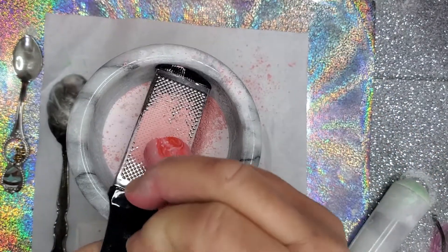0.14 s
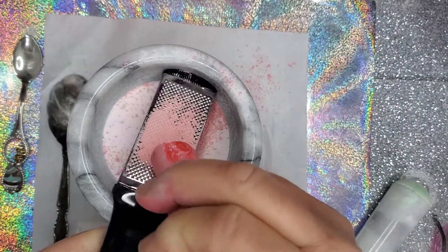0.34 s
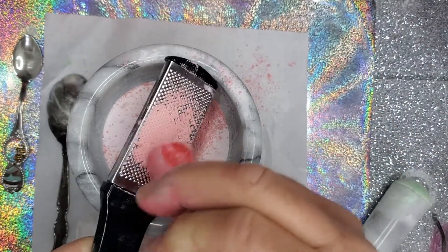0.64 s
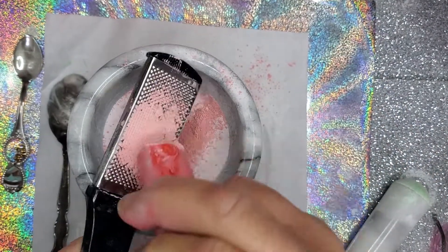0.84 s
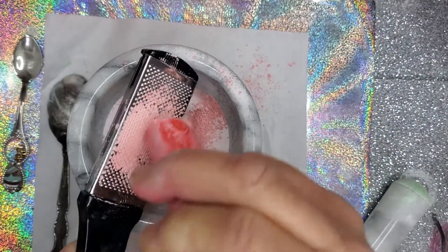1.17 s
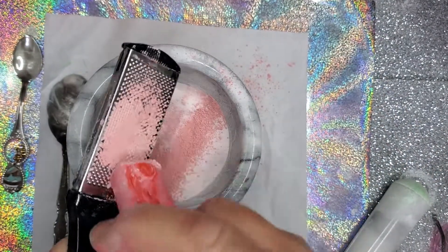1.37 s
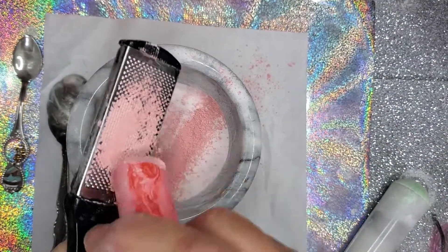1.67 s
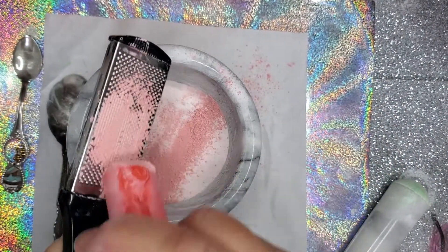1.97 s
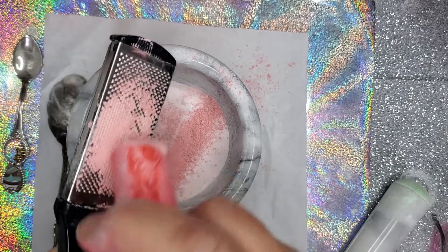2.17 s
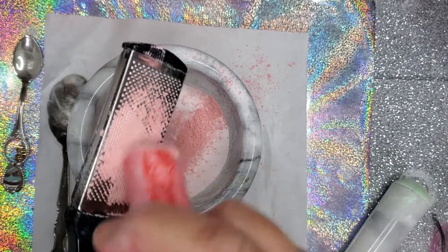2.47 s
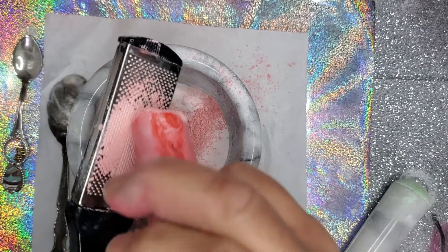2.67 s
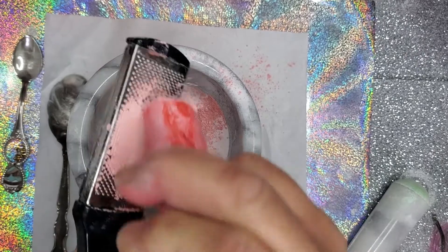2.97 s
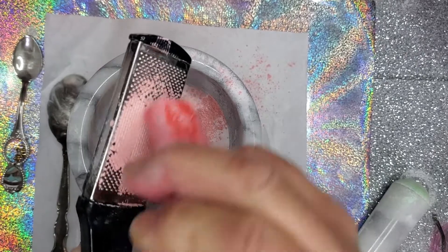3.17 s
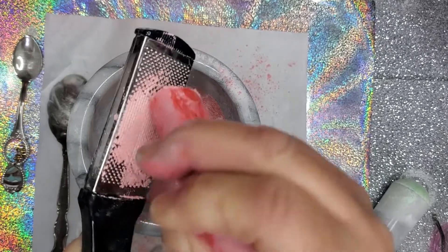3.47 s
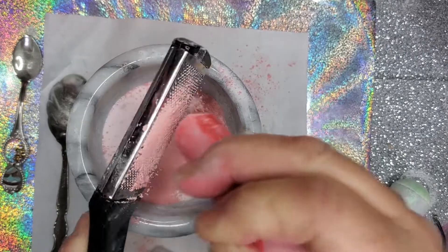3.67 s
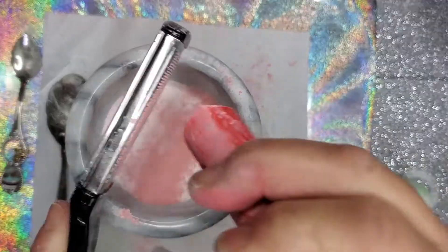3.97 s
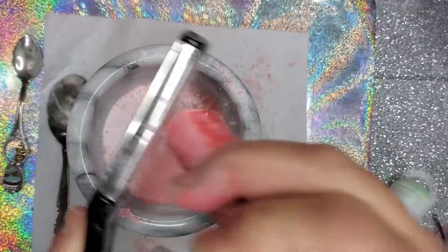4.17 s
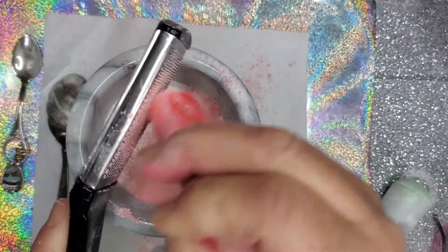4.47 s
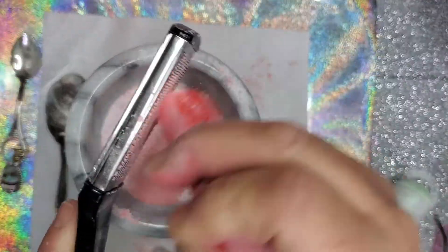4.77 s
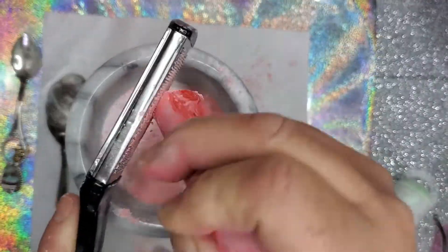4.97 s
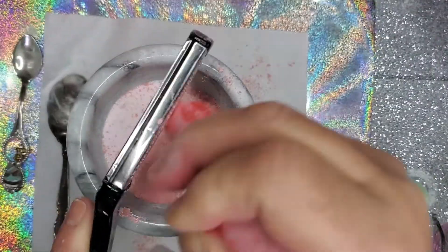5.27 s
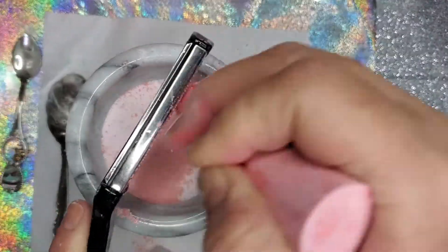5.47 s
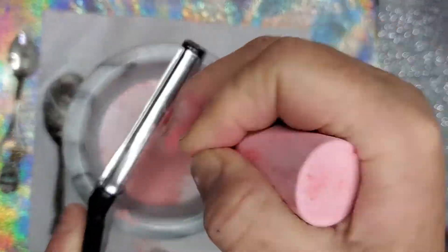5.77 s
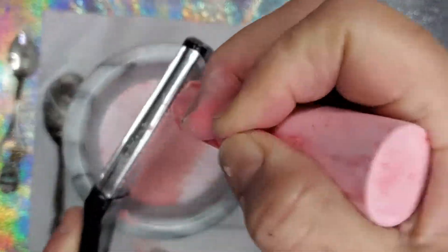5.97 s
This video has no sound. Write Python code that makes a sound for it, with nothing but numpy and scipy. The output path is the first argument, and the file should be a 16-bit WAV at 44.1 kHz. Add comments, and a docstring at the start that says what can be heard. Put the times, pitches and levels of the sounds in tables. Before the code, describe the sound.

Close up in a small quiet room, a metal grater knocks and drags on a heavy stone bowl with a dull table thud. Steady chalk rasping follows, crisp and sandy, alternating away and back. Around the middle it stops, with a knock, a harder clank and another tap, each trailing a light scrape. Then brisk, louder rubbing resumes, with more hollow bowl tone, and carries on to the end.

```python
"""A low table rumble in quiet air, then a steel grater drags and clanks on the rim of a stone mortar.
Chalk is rubbed to and fro on the grater in quick strokes; a few taps and skids break in before they resume.
Breaking grains and rough contacts drive resonators for bowl, plate and teeth; shaking noise drives the table's.
Two close microphone ports hear it with a short noise echo of a small room and steady shaped-noise air."""
import sys
import numpy as np
from scipy import signal
from scipy.fft import rfft, irfft
from scipy.io import wavfile

SR = 44100
rng = np.random.default_rng(int(sys.argv[2]) if len(sys.argv) > 2 else 0)


def output_pcm(signal):
    """Save a mono or channel-first signal as 16-bit PCM at the path in sys.argv[1].

    Samples are clipped to [-1, 1] before scaling.
    """
    pcm = np.clip(np.atleast_2d(signal).T, -1, 1) * 32767
    wavfile.write(sys.argv[1], SR, np.round(pcm).astype(np.int16))


N = 269892  # samples

# Six groups of modes, in this order throughout: rim, bowl, frame, plate, teeth, treble.
# Drive levels are relative: later group gains, mode gains and roughness act on them.

# steady room air: (frequency [Hz], relative level per Hz [dB])
AIR_COLOUR = [(15, -23), (25, -5), (45, 0.5), (102, 0), (261, -5), (371, -13), (500, -13.5), (981, -18.5),
              (3580, -21.5), (8050, -31), (15800, -22.5)]
AIR_DB, AIR_ALIKE = -76.5, 0.532  # rms level; correlation between the ports

# hands jolt the table: (time [s], hold [s], drive [dB])
JOLTS = [(0, 0.0035, -57), (0.211, 0.034, -54.5), (0.276, 0.057, -47), (0.46, 0.016, -80),
         (0.576, .01, -68), (3.835, .03, -81), (4.034, 0.0056, -59), (4.097, 0.013, -73),
         (4.204, 0.05, -70.5), (4.49, 0.037, -78), (5.403, .005, -78.5), (5.554, .005, -63.5),
         (5.676, .01, -80)]
JOLT_RISE_DB_PER_S, JOLT_FALL_DB_PER_S = 399.5, 289
# modes of the table: (frequency [Hz], width [Hz], left [dB], right [dB], extra once grater is upright [dB])
TABLE_MODES = [(59, 29, 15.5, 21.5, 1.5), (110.8, 25, 22, 24.5, 0), (174.8, 27, 18.5, 20, 1),
               (250, 38, 21.5, 21.5, 5.5), (306, 57, 23.5, 20.5, 2)]

# grater dragged on the rim: (time [s], rim drive [dB], bowl drive [dB], steel drive [dB])
DRAG = [(0, -74, -69, -68.5), (.06, -86, -84, -88), (.11, -92, -86, -74.5), (.15, -95, -90.5, -77),
        (.22, -64, -60, -58), (0.244, -45.5, -40.5, -43), (0.279, -61, -61, -64), (.32, -42, -38.5, -45),
        (.34, -44.5, -43, -47.5), (.358, -53, -55.5, -53.5), (.42, -76, -82.5, -82), (0.474, -65, -74, -75),
        (.532, -98, -92, -86), (0.557, -73, -74, -68.5), (.63, -88, -101, -88)]
# column of DRAG for each group: (drive column [index after time])
DRAG_PART = [0, 1, 2, 2, 2, 2]
# drag level of each group: (gain [dB])
DRAG_GAIN = [0, -1, -10, -2, -3.5, -9.5]
# how far each group follows the drag's swing about -55 dB: (share [dB per dB])
DRAG_FOLLOWS = [1.1, 0.97, 1.01, 1.07, 0.95, 0.75]

# blows on the grater: (time [s], stone drive [dB], steel drive [dB], brightness of teeth and treble [dB])
BLOWS = [(.106, -77, -77, 7), (.226, -51, -62, 9), (.238, -33.5, -52, -6), (.243, -35, -57, 3),
         (.246, -34.5, -48, -3), (0.261, -55, -60, -6), (.295, -39, -55, -8), (0.3143, -29.5, -56, -5),
         (0.3188, -28, -57, -5), (.327, -27.5, -61, -4), (0.338, -52, -56, -1), (.556, -72, -85, 11),
         (3.826, -35, -54.5, 12), (3.918, -58, -74, -2), (3.981, -59.5, -69, -8), (4.035, -30.5, -31, -7),
         (4.051, -66, -62, 5), (4.075, -54, -44.5, -2), (4.205, -28.5, -35, 2), (4.215, -42, -53, 1)]
# blow force on each group: (gain [dB])
BLOW_GAIN = [-5.5, 3, -3, 7.5, 0, -1]
BLOW_PEAK_S, BLOW_ROUGH = 0.00069, 0.62  # time to the peak; gain of the grit beside the hard touch
# material of each group: (0 stone, 1 steel [index])
ON_STEEL = [0, 0, 1, 1, 1, 1]
# groups that follow the brightness: (0 no, 1 yes [factor])
BRIGHT = [0, 0, 0, 0, 1, 1]

# mortar thuds on the table: (time [s], strength [dB])
THUDS = [(0.241, -33), (.300, -46.5), (.322, -43), (0.587, -64.5)]
THUD_HZ, THUD_T60_S = 163.4, 0.29

# strokes, in turn away and back: (full speed at [s], rise [s], hold [s], fall [s],
#   plate drive as the hold starts [dB], swell over the hold [dB], brightness of teeth and treble [dB])
# rise and fall are the times for a 30 dB change before SLOW_LOSS
STROKES = [(.653, .034, 0.035, 0.045, -47.5, 1, 1.5), (.767, 0.035, 0.032, 0.026, -45, -0.5, 1),
           (.886, 0.04, 0.034, 0.052, -52, 1.5, 1), (1.003, 0.032, 0.062, 0.028, -48, -3, -0.5),
           (1.151, 0.048, 0.036, .031, -47, -6.5, -2), (1.25, .021, .039, 0.052, -44, 1.5, 1),
           (1.413, 0.029, 0.044, 0.034, -44.5, -2.5, 1), (1.57, 0.052, 0.036, 0.044, -47, 1, 2),
           (1.712, 0.036, 0.06, 0.036, -46, 1, -0.5), (1.842, .017, 0.059, 0.044, -51, 11, 0),
           (1.997, 0.034, .051, .047, -43, -2, -0.5), (2.144, 0.026, .054, 0.04, -48, 5, 1),
           (2.293, 0.038, .059, 0.039, -43, 1, -0.5), (2.438, 0.032, 0.041, 0.05, -50.5, 8, 0),
           (2.581, 0.043, 0.055, 0.038, -47.5, 2.5, -1), (2.733, 0.036, .044, 0.038, -53, 7.5, -1),
           (2.872, 0.037, .058, 0.03, -49.5, 3, 0), (3.016, 0.028, .046, 0.041, -49.5, 8, 1),
           (3.16, 0.044, 0.052, .039, -45.5, 1, -0.5), (3.292, 0.03, .049, 0.04, -52.5, 11.5, 0),
           (3.434, 0.045, .046, .051, -50.5, 1, 0.5), (3.598, 0.065, 0.061, 0.028, -52.5, 10.5, -3),
           (3.864, .013, 0.0076, 0.044, -54.5, 7, -0.5), (4.269, 0.023, 0.021, 0.036, -50.5, -8.5, -2),
           (4.343, 0.024, 0.03, 0.026, -48, 3.5, 2), (4.449, 0.02, 0.063, 0.034, -41, 0.5, -1.5),
           (4.57, .029, 0.05, 0.036, -39.5, 0, -.5), (4.676, .015, .05, 0.032, -42.5, -0.5, -1.5),
           (4.782, 0.026, .058, 0.034, -44.5, 1.5, 1.5), (4.919, 0.028, 0.044, .026, -43.5, -6, -1.5),
           (5.025, 0.033, .051, .041, -46, 2.5, .5), (5.158, 0.026, 0.069, 0.011, -45.5, -3, 1),
           (5.282, 0.026, 0.042, 0.031, -47.5, 0.5, 2), (5.394, 0.021, .026, 0.039, -44, 4, 2),
           (5.516, 0.048, .037, 0.043, -44, 6.5, 0.5), (5.643, 0.037, 0.034, 0.035, -39, -1.5, 0),
           (5.774, 0.029, .019, 0.024, -49, -0.5, -4.5), (5.861, .02, .026, 0.041, -46.5, 3, 2),
           (6.019, 0.0079, 0.041, 0.052, -49.5, 6, -0.5)]
RISE_BEND, FALL_BEND = 0.89, 1.37  # edge curve in dB: under 1 a sharp corner, above 1 a round one
# dulling as the chalk slows, for each group: (extra loss [dB per dB])
SLOW_LOSS = [0, 0.14, 0.049, 0.036, 0.19, 0.15]
CREEP_DB, CREEP_STRETCH = -20.5, 2  # slow rubbing at the turns wakes the plate only; longer edges
# grater held low in the mortar, then raised, then upright: (grip starts [s])
GRIP_FROM_S = [0, 1.2, 3.7]
# each grip, strokes away then back: (rim, bowl at start, bowl at end, frame, teeth,
#   treble at start, treble at end [dB above the plate]; left-right difference [dB])
GRIPS = [
    [(-33, -0.27, 2.5, -7.5, 0, -1.5, -0.18, 3.3), (-32, -1.1, -3, -7.5, 0, -2.5, -0.63, 3.4)],
    [(-24, -11, 2.4, -15.5, -1.16, .5, 0.17, 4.4), (-47.5, -1.5, 4.8, -8.5, -1.3, -1, 0.79, 4.8)],
    [(-31.5, -1, 0, -7.5, 0, 0, 0.0099, 5), (-27, -0.26, 0, -8.5, 0.0069, 0, 0, 5.2)],
]
# how firmly the grater leans on the mortar: (time [s], bowl above the plate [dB])
LEAN = [(.65, -7.5), (.9, -13), (1.17, -12.5), (1.27, -26), (2.15, -25.5), (2.45, -18), (3.43, -18.5),
        (3.62, -11), (3.87, -6.5), (4.3, -3.5), (4.47, -7.5), (4.8, -11.5), (5.05, -13.5), (5.4, -4.5),
        (5.66, -6), (5.78, -13.5), (5.87, 1), (6.03, -5)]

# chalk skids on after a tap: (time [s], hold [s], fall over 30 dB [s], stone drive [dB], steel drive [dB])
SKIDS = [(3.826, 0.023, 0.09, -55, -57.5), (3.99, .045, 0.1, -69, -80), (4.035, 0.0054, 0.11, -53, -45),
         (4.204, 0.016, 0.18, -52.5, -55)]
# skid force on each group: (gain [dB])
SKID_GAIN = [-1.5, 0, -5, 1, -9, -5]
SKID_RISE_S, SKID_PAN_DB = 0.0046, 1  # rise over 30 dB; left-right difference

# all mode tables of mortar and grater share these columns:
#   (frequency [Hz], width [Hz], left [dB], right [dB], extra on the rim [dB], extra once upright [dB])
# stone rim of the mortar, columns as above
RIM = [(389, 130, 8.5, 9, 8.5, 4), (490, 74, 11.5, 10, 3.5, 0), (585, 92, 17.5, 14, -5, -13.5),
       (855, 440, 15, 13.5, -4, -4.5)]
# stone bowl of the mortar, columns as above
BOWL = [(982, 93, 14.2, 12, 1, 0), (1201, 267, 18.27, 18.84, 0.55, 0),
        (1407, 347, 15.5, 12.5, 3.85, 0.0087), (1606, 112, 13, 3.3, 4.1, 0)]
# steel frame of the grater, columns as above
FRAME = [(2068, 215, 16.2, 7.8, -9.5, 0)]
# steel plate of the grater, columns as above
PLATE = [(2580, 205, 5.1, 8.4, 6, 1.9), (2810, 67, 11.5, 11.5, 8, -0.057),
         (3088, 357, 10.2, 12.6, -1.5, 1.15), (3357, 208, 14, 10.4, -3.5, -0.41),
         (3540, 132, 9.6, 6.4, -3, -0.16), (3737, 114, 10.7, 15.8, -1.5, 0.9),
         (4162, 173, 10.2, 7.7, 0.5, -1.7)]
# steel teeth of the grater, columns as above
TEETH = [(4523, 200, 6.8, 4.8, 5, 0), (5086, 276, 8.56, 8.7, -1.5, 0.006), (5596, 365, 10, 6.6, 1.5, 0.012),
         (6000, 51, 6, 2, 13.5, 0), (6220, 286, 5.7, 4, -6, 0.0031), (6954, 390, 10.74, 2.3, -3, 0)]
# treble modes of the steel, columns as above
TREBLE = [(7220, 1270, 1, 4.9, 6, 1.8), (9150, 980, 3.4, 8, 2, -0.5), (10230, 1280, 1.3, 3, 5, 1.5),
          (11150, 120, 7, 2, 1.5, 2.4), (11820, 510, 5.8, 2, 4, 2.1), (13700, 1380, 5, 5, -3, 0.1),
          (14270, 590, 10.9, 5.5, 6, 1.2), (15700, 880, 7, 6.7, -0.5, -1)]
LIFTED_S, TURNED_S = 0.63, 3.55  # the grater leaves the rim; it is turned upright
GRAINS_PER_S, GRAIN_SPREAD_DB = 9000, 0.5
SHARED_HZ = 4470  # above this the ports hear mostly different parts of the plate
# how unevenly rubbing wakes the modes of each group: (spread [dB])
PATCH_DB = [2.9, 1.44, 1.3, 2.29, 3.06, 1.15]
# later arrival of each group at the right port: (lag [samples])
RIGHT_LAG = [6, 7, 9, 9, 9, 9]

ROOM_T60_S, ROOM_DB, WALL_CUT_HZ = 0.18, -18, 9400
CUTOFF_HZ = 15720


def from_db(db):
    """Decibels to gain."""
    return 10 ** (np.asarray(db) / 20)


def from_left(pan_db):
    """Left-right difference as dB for each port."""
    return np.array([[pan_db / 2], [-pan_db / 2]])


def rms_one(x):
    """Scale to rms 1."""
    return x / np.sqrt(np.mean(x ** 2) + 1e-20)


def drift(rate_hz):
    """Smoothed random wander of spread 1, made at a fortieth of the sample rate."""
    r = np.exp(-80 * np.pi * rate_hz / SR)
    noise = rng.standard_normal(N // 40 + 2002)
    slow = signal.lfilter([1], [1, -2 * r, r * r], noise)[2000:]
    return np.interp(np.arange(N) / 40, np.arange(len(slow)), rms_one(slow))


def resonance(x, hz, width_hz):
    """One mode: a two-pole band-pass with gain 1 on top, ringing longer when narrow."""
    r = np.exp(-np.pi * width_hz / SR)
    poles = [1, -2 * r * np.cos(2 * np.pi * hz / SR), r * r]
    return signal.lfilter([(1 - r * r) / 2, 0, (r * r - 1) / 2], poles, x + 1e-18)


def air():
    """Steady rumble and hiss of the room: coloured noise, partly alike at the two ports."""
    mid, side = rng.standard_normal((2, N))
    pair = np.sqrt(1 + AIR_ALIKE) * mid + np.sqrt(1 - AIR_ALIKE) * side * [[1], [-1]]
    hz, db = np.transpose(AIR_COLOUR)
    bins_hz = np.fft.rfftfreq(N, 1 / SR)
    colour = from_db(np.interp(np.log(bins_hz + 1), np.log(hz), db))
    return from_db(AIR_DB) * rms_one(irfft(rfft(pair) * colour, N))


def table():
    """Rough shaking by the hands rings the low modes of the table."""
    t, level, out = np.arange(N) / SR, np.zeros(N), np.zeros((2, N))
    for s, hold, db in JOLTS:
        before = JOLT_RISE_DB_PER_S * (s - t)
        after = JOLT_FALL_DB_PER_S * (t - s - hold)
        level += from_db(db - np.maximum(before, after).clip(0, 200))
    shaking = rng.standard_normal(N) * level
    for j, (hz, width_hz, left_db, right_db, turned_db) in enumerate(TABLE_MODES):
        pose = from_db(turned_db * (t > TURNED_S))
        ring = resonance(shaking * pose, hz, width_hz)
        out += (-1) ** j * from_db([[left_db], [right_db]]) * ring  # neighbours in opposite polarity
    return out


def drag():
    """Grater scraping on the rim: a slow force curve for each group of modes and port."""
    t, force = np.arange(N) / SR, np.zeros((6, 2, N))
    s, *parts = np.transpose(DRAG)
    for k in range(6):
        swing = np.interp(t, s, parts[DRAG_PART[k]], right=-300) + 55
        force[k] = from_db(DRAG_GAIN[k] - 55 + DRAG_FOLLOWS[k] * swing + from_left(3.5))
    return force


def blows():
    """Clanks and taps: each is a short rough contact that dies away, with one hard touch."""
    force, t = np.zeros((6, 2, N)), np.arange(400) / SR
    grit = rng.standard_normal((len(BLOWS), 400))
    contact = BLOW_ROUGH * grit * t / BLOW_PEAK_S * np.exp(1 - t / BLOW_PEAK_S)
    contact[:, round(BLOW_PEAK_S * SR)] += 7.0  # the hard touch
    for (s, *db, bright_db), shape in zip(BLOWS, contact):
        parts = np.array(db)[ON_STEEL] + np.multiply(BRIGHT, bright_db) + BLOW_GAIN
        start = round(s * SR)
        force[:, :, start:start + 400] += from_db(parts[:, None, None] + from_left(8.2)) * shape
    return force


def thuds():
    """Each mortar thud sets the deepest clear mode of the table top ringing."""
    clicks = np.full(N, 1e-18)
    for s, db in THUDS:
        clicks[round(s * SR)] += from_db(db)
    r, w = from_db(-60 / (THUD_T60_S * SR)), 2 * np.pi * THUD_HZ / SR
    ring = signal.lfilter([0, np.sin(w)], [1, -2 * r * np.cos(w), r * r], clicks)
    return signal.sosfilt(signal.butter(2, 400, fs=SR, output="sos"), ring)  # a soft contact


def strokes():
    """Each stroke speeds up, holds and slows; grip and direction set which parts it wakes."""
    t, force = np.arange(N) / SR, np.zeros((6, 2, N))
    for i, (s, rise, hold, fall, db, swell_db, bright_db) in enumerate(STROKES):
        grip = GRIPS[np.searchsorted(GRIP_FROM_S, s) - 1][i % 2]
        rim, bowl0, bowl1, frame, teeth, treble0, treble1, pan = grip
        span = slice(round((s - 4 * rise) * SR), round((s + hold + 4 * fall) * SR))
        now = t[span]
        along = np.clip((now - s) / hold, 0, 1)
        outside = np.maximum(np.maximum((s - now) / rise, (now - s - hold) / fall), 0)
        edge = outside ** np.where(now < s, RISE_BEND, FALL_BEND)
        level = db + swell_db * along + from_left(pan)
        bowl = np.interp(s, *np.transpose(LEAN)) + bowl0 + (bowl1 - bowl0) * along
        treble = treble0 + (treble1 - treble0) * along
        for k, above in enumerate([rim, bowl, frame, 0, teeth, treble]):
            loss = 30 * edge * (1 + SLOW_LOSS[k])
            force[k, :, span] += from_db(level + above + BRIGHT[k] * bright_db - loss)
        force[3, :, span] += from_db(level + CREEP_DB - 30 * outside / CREEP_STRETCH)  # creep on the plate
    return force


def skids():
    """The chalk skids on after a tap: a quick rise, a short hold and a fall straight in dB."""
    t, force = np.arange(N) / SR, np.zeros((6, 2, N))
    for start, hold, fall, *db in SKIDS:
        span = slice(round((start - .02) * SR), round((start + .4) * SR))
        now = t[span]
        outside = np.maximum(np.maximum((start - now) / SKID_RISE_S, (now - start - hold) / fall), 0)
        for k, steel in enumerate(ON_STEEL):
            force[k, :, span] += from_db(db[steel] + SKID_GAIN[k] + from_left(SKID_PAN_DB) - 30 * outside)
    return force


def rubbing():
    """Drag, strokes and skids together, roughened as the chalk catches and slips."""
    catch_and_slip_db = 1.0 * drift(40) + 0.86 * drift(350)
    return (drag() + strokes() + skids()) * from_db(catch_and_slip_db)


def grains():
    """Chalk grains snapping on the teeth: dense clicks of uneven size and random sign; rms 1."""
    size_db = GRAIN_SPREAD_DB * np.minimum(rng.exponential(1, N), 5)
    sizes = from_db(size_db) * rng.choice([-1, 1], N)
    return rms_one(sizes * (rng.random(N) < GRAINS_PER_S / SR))


def grater():
    """Grain snaps and blows ring the modes of mortar and grater; the moving chalk wakes each unevenly."""
    rub, hits, out, t = rubbing(), blows(), np.zeros((2, N)), np.arange(N) / SR
    shared, apart = grains(), grains()
    for k, modes in enumerate([RIM, BOWL, FRAME, PLATE, TEETH, TREBLE]):
        lag = RIGHT_LAG[k]
        for j, (hz, width_hz, left_db, right_db, rim_db, turned_db) in enumerate(modes):
            alike = 1 / (1 + (hz / SHARED_HZ) ** 2)
            snaps = np.array([shared, alike * shared + np.sqrt(1 - alike ** 2) * apart])
            pose = from_db(rim_db * (t < LIFTED_S) + turned_db * (t > TURNED_S))
            patches = from_db(PATCH_DB[k] * drift(13.4))
            left, right = pose * (snaps * rub[k] * patches + hits[k])
            force = np.array([left, np.r_[np.zeros(lag), right[:-lag]]])
            ring = resonance(force, hz, width_hz)
            out += (-1) ** j * from_db([[left_db], [right_db]]) * ring
    return out


def room(x):
    """Short echo: noise that dies away, duller in the walls, its own at each port."""
    t = np.arange(round(.4 * SR)) / SR
    tail = rng.standard_normal((2, len(t))) * from_db(-60 * t / ROOM_T60_S) * (t > .004)
    tail = signal.sosfilt(signal.butter(1, WALL_CUT_HZ, fs=SR, output="sos"), tail)
    tail /= np.sqrt(np.sum(tail ** 2, axis=1, keepdims=True))
    return from_db(ROOM_DB) * signal.fftconvolve(x, tail, axes=1)[:, :N]


def scene():
    """Grater and table, their room echo and the quiet air."""
    close = grater() + table() + thuds()
    return close + room(close) + air()


def record(dry):
    """A steep low-pass cuts the top."""
    return signal.sosfilt(signal.ellip(12, .5, 70, CUTOFF_HZ, fs=SR, output="sos"), dry)


dry = scene()
out = record(dry)
output_pcm(out)
```